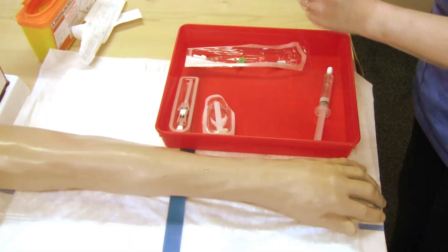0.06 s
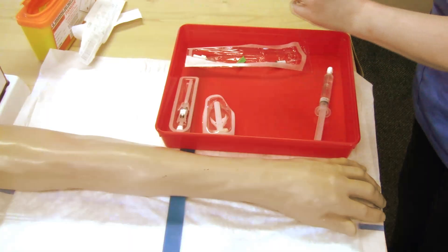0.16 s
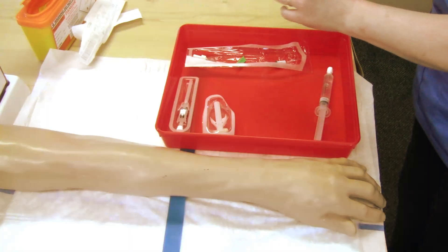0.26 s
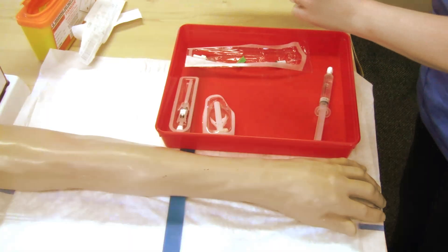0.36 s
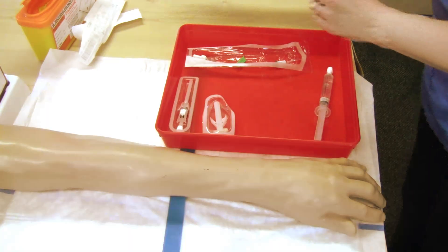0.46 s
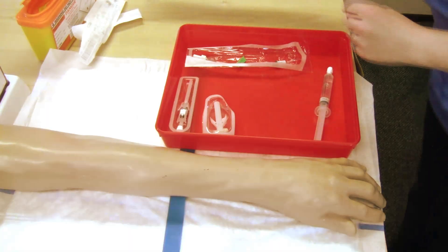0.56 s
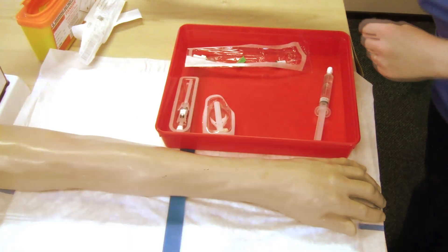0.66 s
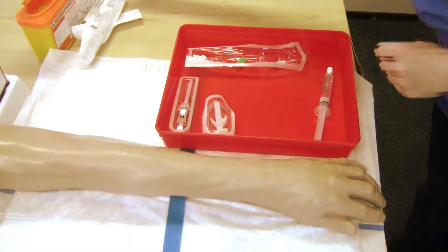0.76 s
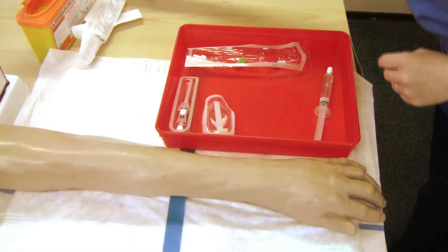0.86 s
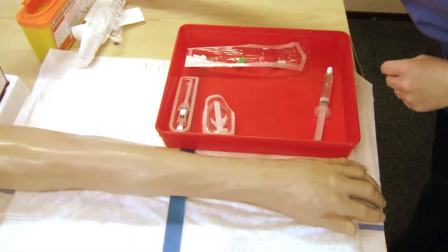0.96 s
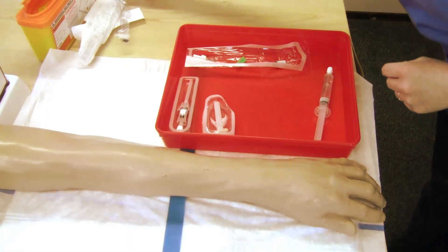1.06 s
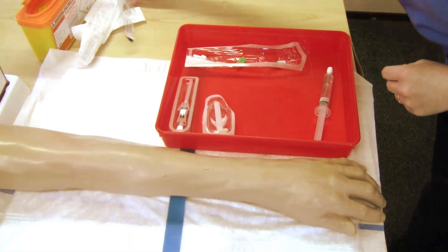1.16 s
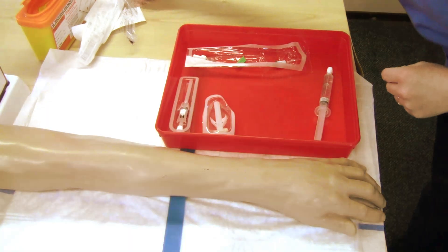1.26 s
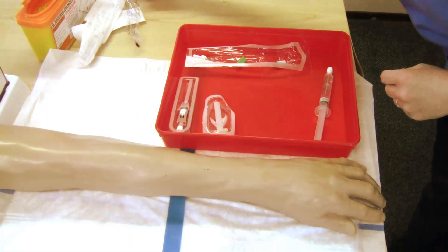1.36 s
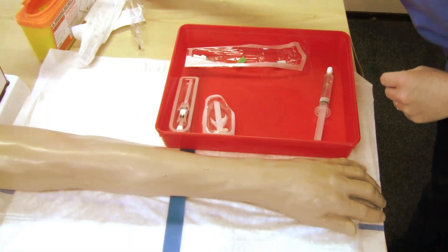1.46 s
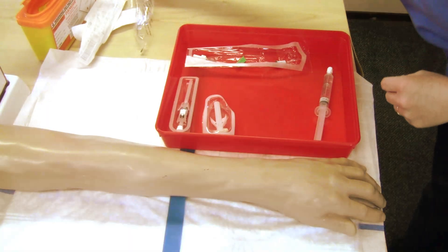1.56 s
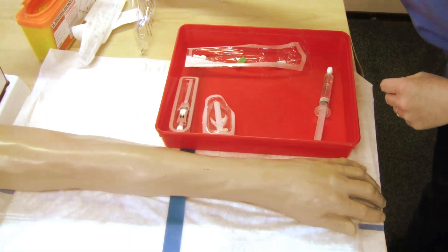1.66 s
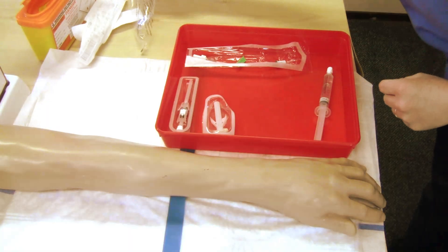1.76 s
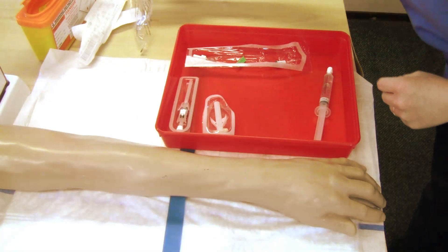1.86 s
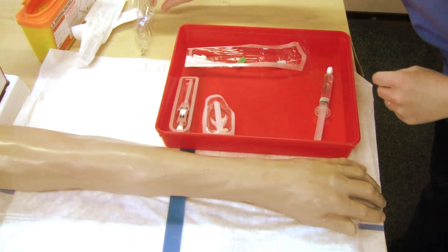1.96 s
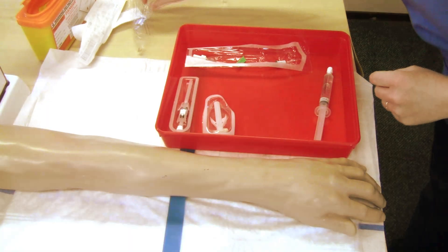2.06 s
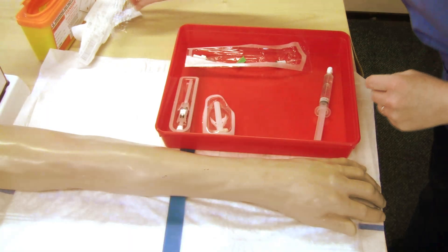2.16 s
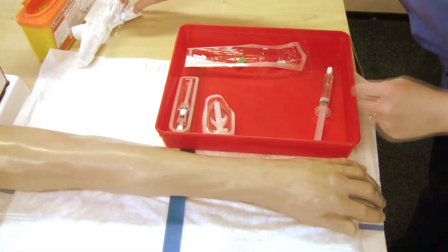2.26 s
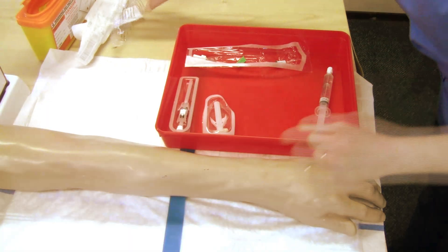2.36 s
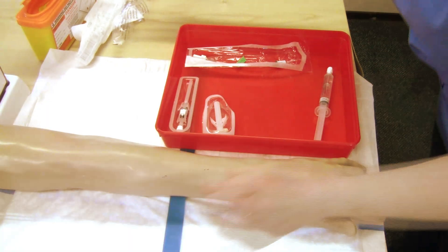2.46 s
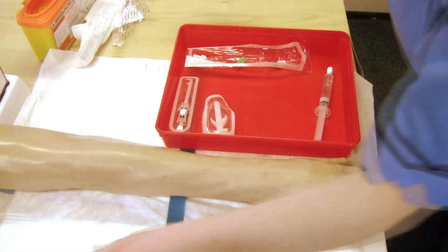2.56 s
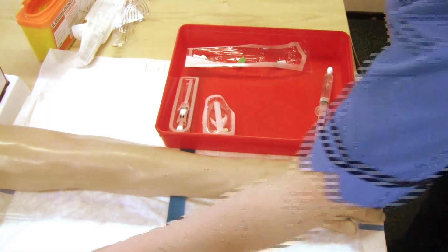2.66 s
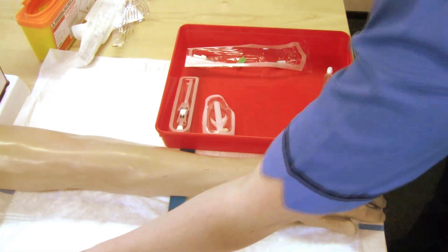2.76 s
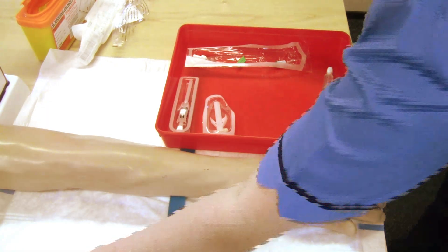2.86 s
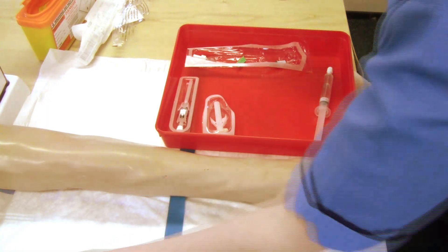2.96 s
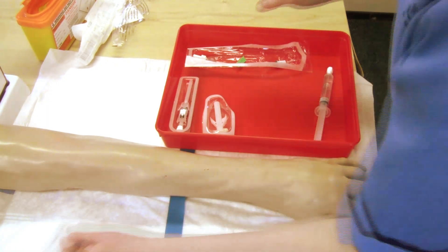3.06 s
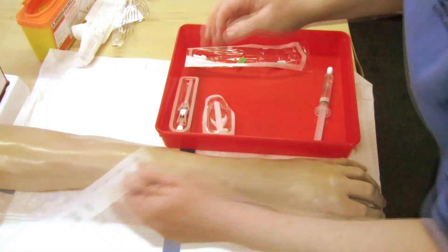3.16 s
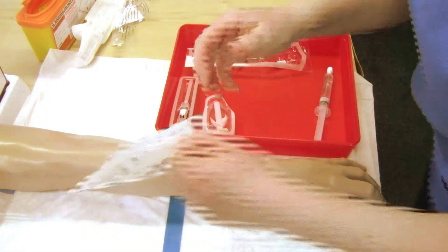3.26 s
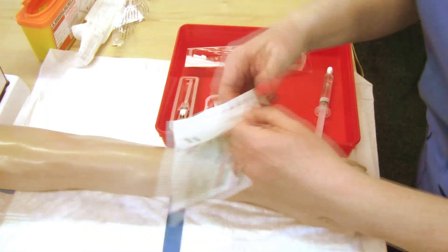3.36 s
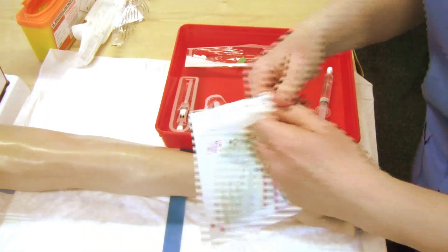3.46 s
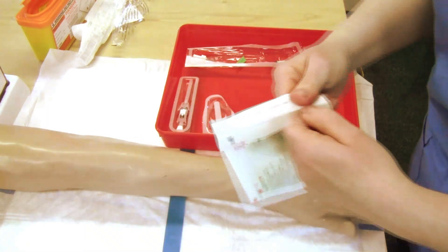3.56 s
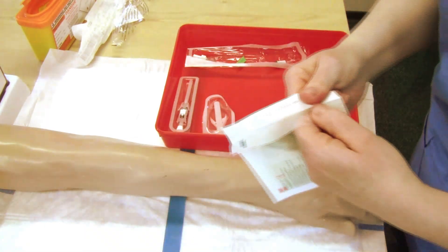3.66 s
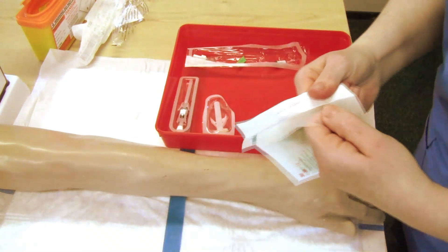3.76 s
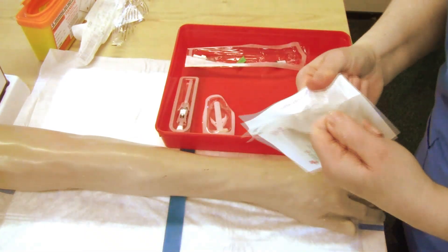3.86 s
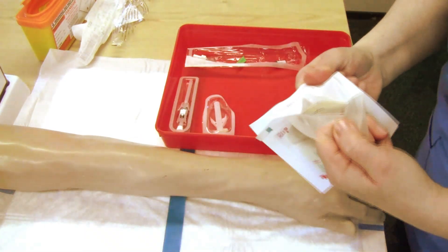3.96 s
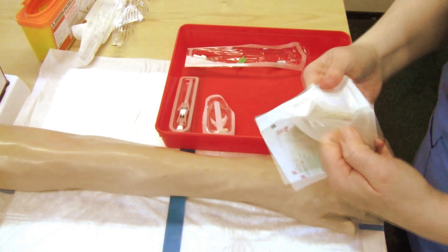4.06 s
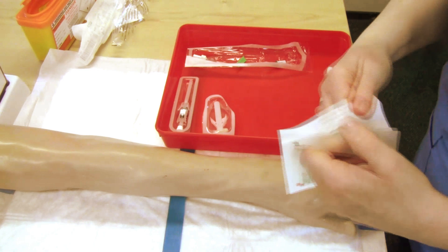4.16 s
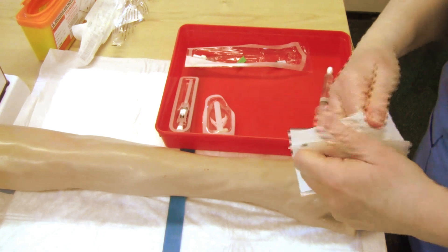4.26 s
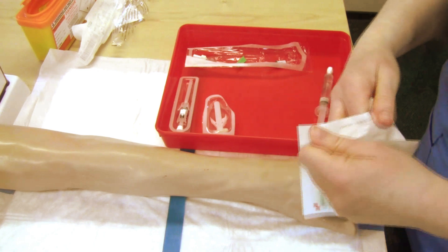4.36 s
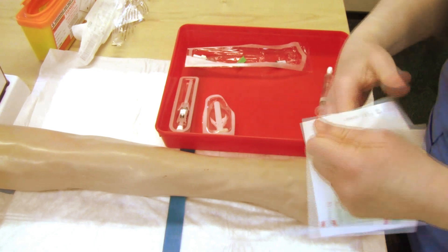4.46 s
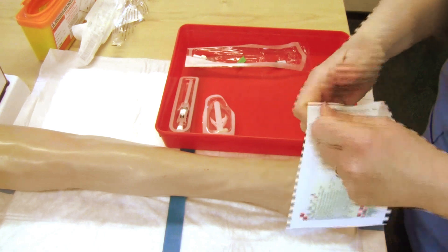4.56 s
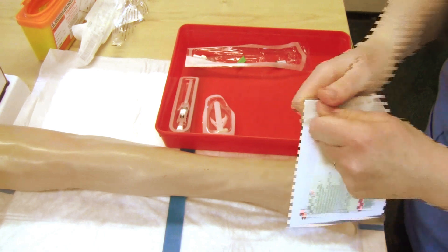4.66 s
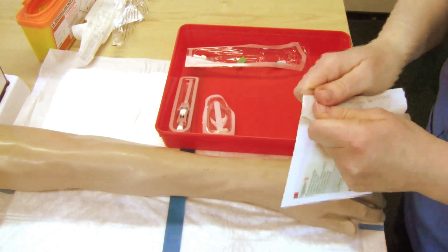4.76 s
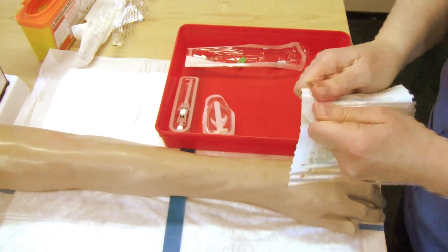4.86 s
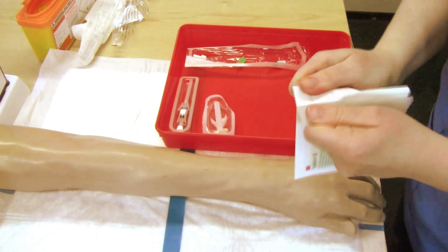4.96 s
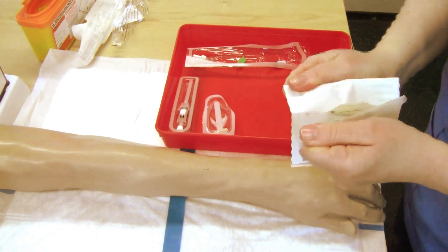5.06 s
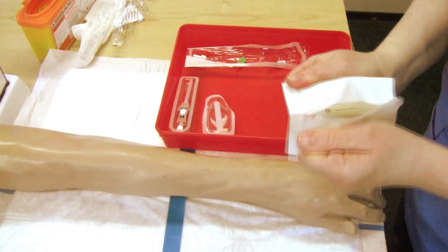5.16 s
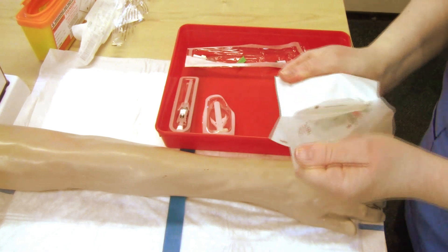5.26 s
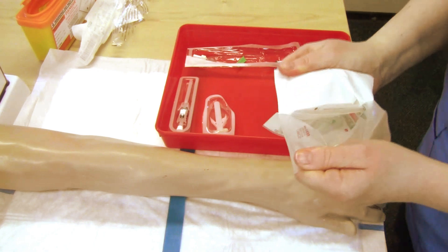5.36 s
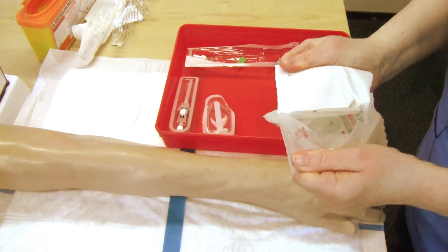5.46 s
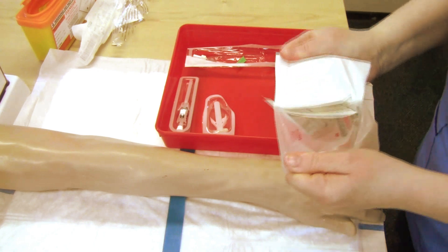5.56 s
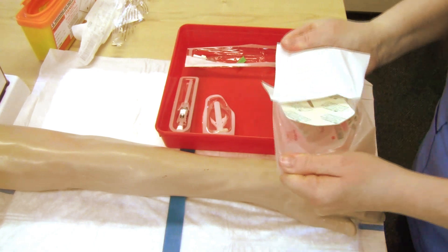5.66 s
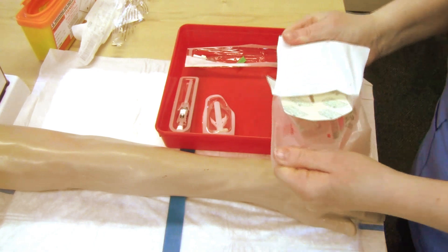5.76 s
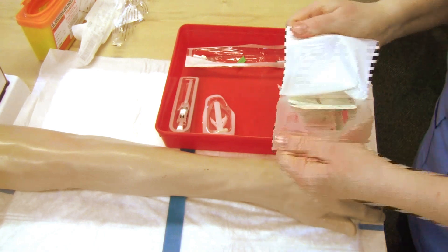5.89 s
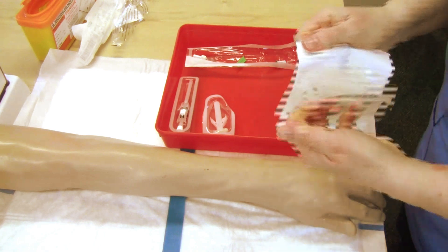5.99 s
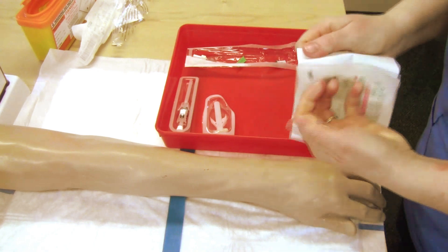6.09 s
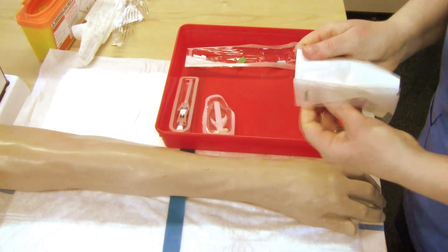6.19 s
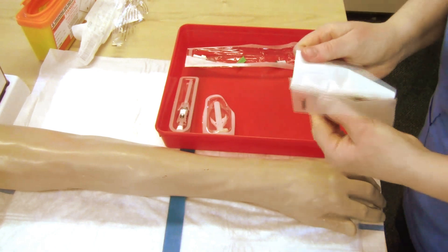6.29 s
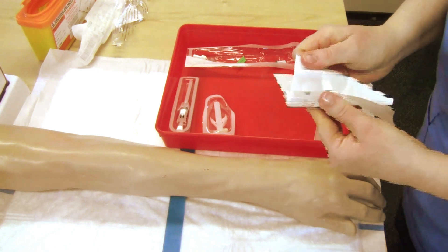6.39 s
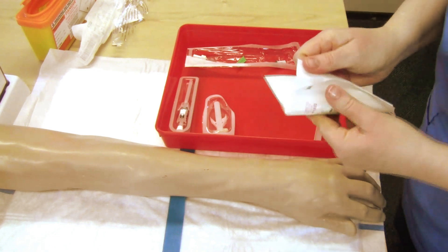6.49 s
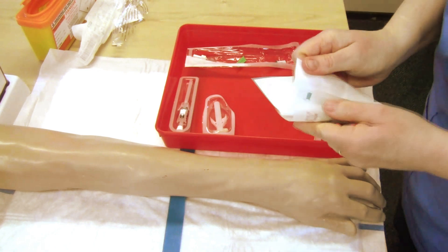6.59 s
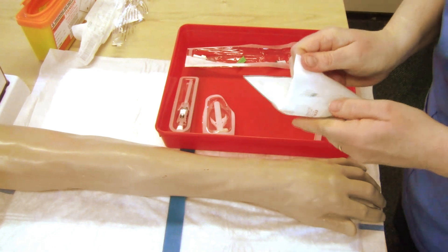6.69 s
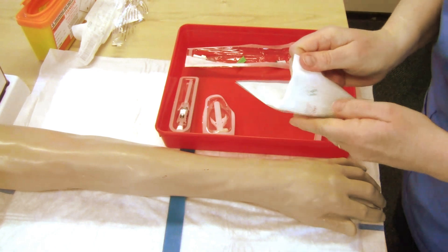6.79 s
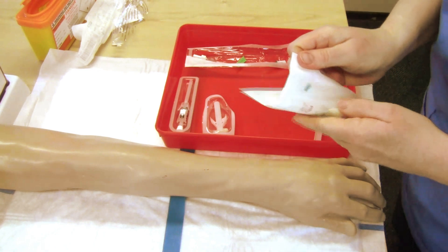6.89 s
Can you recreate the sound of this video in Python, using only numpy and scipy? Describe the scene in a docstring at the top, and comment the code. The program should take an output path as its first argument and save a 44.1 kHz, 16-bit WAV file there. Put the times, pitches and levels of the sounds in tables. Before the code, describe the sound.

A small indoor room with soft ventilation noise, a faint low hum and slight rumble. From 0 to 0.8 s a thin film wrapper is crumpled at a little distance, bright and crackly, with short room echoes. From 0.9 to 2.5 s it thins to isolated small ticks and faint rustles as it is put down. Around 3.0-3.2 s a sleeve brushes past, a soft dull cloth rub. From 3.7 s a paper-and-film pouch crackles close to the microphone; at 3.9 s its seal slips in a very loud, sharp, rapid zipping rip, overloading slightly. Crisp snaps follow to 4.6 s, then a brief lull. At 5.1 s comes another loud ripping burst with a tiny low puff, then dense stiff pops and peeling crackle until 6.0 s, strong near 5.7 s. A sharp snap at 6.2 s precedes lighter, sparser crinkles to about 6.9 s.

```python
"""Sterile packets opened over a tray

In a small treatment room, close to a stereo microphone, a film wrapper is crumpled and put down at the far
side of the table and a sleeve brushes past; then a paper-and-film pouch is peeled open nearby. Creases, crackle
and the seal are short noise bursts and ringing modes, with room echoes; cloth, air and rumble are shaped noise."""
import sys
import numpy as np
from scipy import signal
from scipy.fft import rfft, irfft
from scipy.io import wavfile

SR = 44100
rng = np.random.default_rng(int(sys.argv[2]) if len(sys.argv) > 2 else 0)


def unload_audio(sound):
    """Save the sound as a 16-bit wav file, at the path given as the first command line argument."""
    columns = np.transpose(np.atleast_2d(sound))
    # keep every value between -1 and 1, then stretch to whole-number steps
    steps = np.round(np.clip(columns, -1, 1) * 32767)
    wavfile.write(sys.argv[1], SR, steps.astype(np.int16))


N = 305613
TIME = np.arange(N) / SR
# the sheet's low body lies below the first edge, the treble of its creases above the second
BODY_HZ, TREBLE_HZ = 1400, 5500


def undb(db):
    """Decibels to gain."""
    return 10 ** (np.asarray(db) / 20)


def unit(x):
    """Scale to rms 1."""
    return x / np.sqrt(np.mean(x ** 2) + 1e-18)


def along(points, hz):
    """Read (Hz, value) points on a log-frequency axis."""
    f, value = np.transpose(points)
    return np.interp(np.log(hz + 1), np.log(f), value)


def over_time(points):
    """Read (s, dB) points at every sample."""
    return np.interp(TIME, *np.transpose(points))


def colour(x, points):
    """Filter by a (Hz, dB) spectrum."""
    hz = np.fft.rfftfreq(len(x), 1 / SR)
    return irfft(rfft(x) * undb(along(points, hz)), len(x))


def causal(gain):
    """The quickest (minimum-phase) impulse response that has this gain over frequency."""
    cepstrum = irfft(np.log(gain + 1e-6))
    half = len(cepstrum) // 2
    # fold the cepstrum onto positive times
    cepstrum[1:half] *= 2
    cepstrum[half + 1:] = 0
    return irfft(np.exp(rfft(cepstrum)))[:half]


def add(track, s, sound):
    """Mix a sound in at time s."""
    start = int(np.clip(s * SR, 0, N - 1))
    track[start:start + len(sound)] += sound[:N - start]


def ventilation(air_db=-51, side_db=-11, waver_rad=.25):
    """Steady air noise, partly different in the two channels, with a slightly wavering hum in both."""
    # The air noise. Each row: frequency in Hz, relative level in dB.
    air = [(25, -16), (45, -18.5), (80, -0.5), (130, -5), (210, -5), (310, -7), (450, -13), (700, -11.5),
           (1500, -15), (3500, -21.5), (7000, -25.5), (11000, -32), (16000, -39)]
    # The hum's tones. Each row: frequency in Hz, rms level in dB.
    hum = [(59.5, -100), (99.7, -66.5), (199.4, -56.5), (300.5, -61)]
    mid, side = (unit(colour(rng.standard_normal(N), air)) * undb(air_db) for _ in range(2))
    for hz, db in hum:
        drift = np.interp(TIME, np.linspace(0, N / SR, 40), rng.standard_normal(size=40))
        phase = 2 * np.pi * hz * TIME + waver_rad * drift
        mid = mid + np.sqrt(2) * undb(db) * np.sin(phase)
    side = undb(side_db) * side
    return np.array([mid + side, mid - side])


def rumble(corner_hz=110):
    """A faint dull rumble, noise kept to the lowest octaves, comes and goes."""
    # The rumble's swell. Each row: time in seconds, level in dB.
    swell = [(0, -72), (1, -64), (1.5, -54.5), (3.3, -58), (4, -65)]
    lowpass = signal.butter(4, corner_hz, fs=SR, output="sos")
    low = signal.sosfilt(lowpass, rng.standard_normal(N))
    return unit(low) * undb(over_time(swell))


def sheet_responses(size=1024, order=8):
    """How the sheet answers a tick: the flexing panel, the facets, the sharp creases."""
    # What the sheet radiates. Each row: frequency in Hz, gain in dB.
    radiation = [(120, -32), (260, -10), (450, -8), (680, -5.5), (1000, -5), (1250, -6), (1600, 0.5),
                 (2400, 8), (3300, 13.5), (4600, 9), (6000, 3.5), (8300, 5), (10500, 0.5), (13000, -10.5),
                 (16000, -29)]
    hz = np.fft.rfftfreq(size, 1 / SR)
    below_body, below_treble = (1 / (1 + (hz / edge) ** order) for edge in (BODY_HZ, TREBLE_HZ))
    shares = below_body, below_treble - below_body, 1 - below_treble
    gain = undb(along(radiation, hz))
    return [causal(gain * np.sqrt(np.abs(share))) for share in shares]


def body_level(s, treble_db, body_per_treble=0.31):
    """Low body of a buckle, in dB: more on a slack sheet than a taut one, less on a small bright patch."""
    # How slack the sheet hangs. Each row: time in seconds, body below 1.4 kHz in dB before the patch's share.
    slackness = [(0, -4.5), (0.5, -10), (1, -6.5), (1.3, -10), (3.68, -0.5), (3.75, -42), (3.97, -10.5),
                 (4.22, -12.5), (4.42, -3.5), (4.96, -4), (5.11, -24.5), (5.16, -6.5), (5.61, -4.5),
                 (5.69, -7.5), (5.81, -4.5), (6.52, -5), (6.93, -17)]
    return np.interp(s, *np.transpose(slackness)) - body_per_treble * treble_db


def radiate(forces, responses, seconds, db, body_db, treble_db):
    """Three forces sound through body, facets and creases; the levels are rms over the given seconds."""
    out = 0
    for force, response, part_db in zip(forces, responses, (body_db, 0, treble_db)):
        part = signal.fftconvolve(force, response)
        to_unit = np.sqrt(seconds * SR / np.sum(part ** 2))
        out = out + part * undb(db + part_db) * to_unit
    return out


def facet(dice, t, low_hz=900, high_hz=9000):
    """A few short decaying modes of one patch of film; every patch has its own size."""
    place, life, phase = dice.reshape(3, -1, 1)
    hz = low_hz * (high_hz / low_hz) ** place
    ring_s = .001 * (.5 + life)
    modes = np.sin(2 * np.pi * (hz * t + phase)) * np.exp(-t / ring_s)
    return unit(np.sum(modes, axis=0))


def strokes(responses, per_s=1300, thinning=.45, spread_db=3.0, edge=0.098, settle_s=0.0017,
            rub=0.36, fuller_db=3, count=12):
    """Tiny creases and glue threads crackle at random over the rub of paper; gentler strokes more sparsely."""
    # Strokes of crumpling, sliding and peeling. Each row: start in seconds, end in seconds,
    # level from 1.4 to 5.5 kHz in dB, treble above that in dB relative to it.
    hand_strokes = [(0, 0.066, -29, 5.5), (.111, 0.194, -33.5, 5.5), (0.272, 0.389, -33.5, 2),
                    (0.434, 0.552, -43, 0.5), (.9, 1.18, -48.5, -2.5), (1.366, 1.451, -49, 0.5),
                    (1.983, 2.006, -48, -1), (2.185, 2.226, -39.5, 2.5), (2.245, 2.397, -47, -2),
                    (2.596, 2.916, -73, 0), (3.149, 3.32, -61.5, 2.5), (3.439, 3.725, -57, 5.5),
                    (3.905, 3.919, -12.5, -2.5), (3.918, 4.027, -19.5, 2.5), (4.466, 4.67, -45, 0.5),
                    (4.825, 4.857, -37, -7), (4.95, 5.085, -38, -10.5), (5.104, 5.132, -6.5, -6),
                    (5.126, 5.187, -19, -1.5), (5.246, 5.352, -29.5, -5.5), (5.314, 5.402, -21, 0.5),
                    (5.659, 5.737, -24.5, -7), (5.668, 5.694, -16.5, 1), (5.821, 6.053, -50.5, -12),
                    (6.078, 6.114, -28.5, -1.5), (6.116, 6.353, -42, -2.5), (6.376, 6.607, -46, 4.5),
                    (6.678, 6.798, -38.5, -4), (6.85, 6.933, -44.5, -1)]
    out, t, age = np.zeros(N), np.arange(SR // 120) / SR, np.arange(SR // 3) / SR
    for start, end, db, treble_db in hand_strokes:
        rate = per_s * undb(thinning * (db + 20.0))  # ticks per second
        ticks = np.zeros((3, len(age)))
        for _ in range(count):
            chance = rng.random(len(age))
            sizes = undb(spread_db * np.minimum(rng.exponential(size=len(age)), 4))
            burst = unit(rng.standard_normal(len(t)) * np.exp(-t / settle_s))
            grain = burst + facet(rng.random(size=9), t)
            # some patches of the sheet sound dull, others bright
            tone = undb(4.1 * rng.standard_normal((3, 1)))
            hits = (chance < rate / count / SR) * sizes
            ticks += tone * signal.fftconvolve(hits, grain)[:len(age)]
        seconds = max(end - start, .01)
        # gentler strokes take hold and let go more slowly
        from_edge = np.minimum(age, seconds - age) / (edge * seconds)
        grip = np.clip(from_edge * undb(thinning * (db + 45)), 0, 1)
        forces = [grip * (unit(row) + rub * rng.standard_normal(len(age))) for row in ticks]
        body_db = body_level((start + end) / 2, treble_db) + fuller_db
        add(out, start, radiate(forces, responses, seconds, db, body_db, treble_db))
    return out


def flexing(per_s=300, edge_s=0.012):
    """Larger panels pop softly in and out at random: low, papery flutter."""
    # The whole pouch or wrapper flexing under the fingers. Each row: start in seconds, end in seconds, level in dB.
    flexes = [(0, 0.2, -45.5), (5.327, 5.407, -34.5), (5.615, 5.662, -28), (5.823, 6.037, -56)]
    # The hollow sound of a flexing panel. Each row: frequency in Hz, gain in dB.
    panel = [(120, -27), (240, -8), (340, -1), (480, 1), (650, -10), (1100, -24), (3000, -60)]
    sizes = undb(4.5 * rng.standard_normal(N))
    pops = (rng.random(N) < per_s / SR) * rng.choice([-1, 1], N) * sizes
    flutter, out = colour(pops, panel), np.zeros(N)
    for start, end, db in flexes:
        part = flutter * np.clip(np.minimum(TIME - start, end - TIME) / edge_s, 0, 1)
        # the level is rms over the flex alone
        out += unit(part) * undb(db) * np.sqrt(abs(end - start) * SR / N)
    return out


def snaps(responses, travel_s=0.0032, body_s=0.0021, facet_s=0.002, crease_s=0.00046, ring=0.56,
          crack=1.9, treble_crack=3, creak_db=-22, span_s=0.0058):
    """A crease creaks, then a buckle runs along it for a few ms; high frequencies die first."""
    # Creases that buckle with a distinct snap. Each row: time in seconds, level from 1.4 to 5.5 kHz in dB,
    # treble above that in dB relative to it.
    buckles = [(.147, -18, -1.5), (0.209, -34.5, 10.5), (0.265, -32, 7.5), (.403, -34.5, 6),
               (.539, -33.5, 1), (.63, -38.5, 0.5), (.681, -33.5, -1.5), (.759, -36, 2), (.782, -33, -2.5),
               (0.9, -31.5, 1), (0.9636, -36.5, 6), (1.0059, -33.5, 9), (1.059, -39.5, 7),
               (1.3209, -43.5, -5), (1.334, -43.5, -56), (1.394, -47, 11), (1.642, -39.5, -2.5),
               (1.733, -46, -1.5), (1.918, -57, 7), (2.261, -37.5, 5.5), (2.281, -38, -9),
               (2.308, -45.5, 11.5), (2.538, -35, -2.5), (2.948, -42.5, -11), (3.1131, -38.5, -3),
               (3.4497, -33.5, 1.5), (3.534, -41.5, -2.5), (3.6786, -29, -11), (3.7517, -20, -8.5),
               (3.8171, -31.5, -9), (3.893, -19.5, -1), (3.996, -18, 4), (4.136, -34, 4), (4.164, -24, 0),
               (4.176, -13.5, -8.5), (4.187, -17.5, -6), (4.2146, -13, -1), (4.2344, -21.5, 8.5),
               (4.26, -22, 2), (4.4171, -18.5, 0.5), (4.5063, -21, -3), (4.561, -23, -5),
               (4.8885, -29, -2.5), (4.9639, -28, -7.5), (5.022, -39.5, 3), (5.0811, -15, -9),
               (5.094, -15.5, -9), (5.18, -29, 8.5), (5.239, -22, -7), (5.265, -31, 9), (5.392, -20.5, 0.5),
               (5.411, -12.5, 0.5), (5.463, -27, -22), (5.495, -26, -9), (5.6017, -20, -10),
               (5.6118, -19, -3), (5.642, -15, -3.5), (5.658, -18.5, -2), (5.6953, -8.5, 0.5),
               (5.7781, -14, 1), (5.8107, -15.5, -0.5), (5.8778, -16.5, -4), (5.933, -25, -14),
               (5.974, -21.5, -15), (5.989, -24, 3.5), (5.9994, -16, -6), (6.082, -29, -10),
               (6.157, -24, -6.5), (6.2132, -12.5, -5), (6.2426, -23, -1), (6.3773, -29.5, -1),
               (6.409, -20, -6), (6.45, -27, -1.5), (6.5145, -19.5, -3), (6.718, -27.5, -15),
               (6.757, -32, -21), (6.856, -34, -12)]
    lead = SR // 200  # samples of creak ahead of the snap
    out, t = np.zeros(N), np.arange(SR // 60) / SR
    for s, db, treble_db in buckles:
        since = np.maximum(t - travel_s * rng.random(), 0)
        rattle, modes = rng.standard_normal(len(t)), facet(rng.random(size=30), t)
        creak = undb(creak_db) * rng.standard_normal(lead) ** 3 * rng.random()
        forces = []
        for settle_s, first in (body_s, crack), (facet_s, crack), (crease_s, treble_crack):
            force = unit(rattle * np.exp(-since / settle_s)) + ring * modes
            force[0] += first * np.sign(rattle[0])
            forces.append(np.r_[creak, force])
        body_db = body_level(s, treble_db)
        add(out, s - lead / SR, radiate(forces, responses, span_s, db, body_db, treble_db))
    return out


def room_response(gap_s=0.0011, early_s=0.0079, early=1.75, lumpy=0.88, tilt_db=-1.67, size=2048):
    """Table and tray throw back a quick cluster of echoes; the walls add a longer, duller tail."""
    # Reverberation. Each row: frequency in Hz, time to fall by 60 dB in seconds.
    reverberation = [(200, 0.98), (1000, 0.55), (4000, 0.36), (9000, 0.35), (15000, 0.074)]
    t = np.arange(SR // 2) / SR
    hz = np.fft.rfftfreq(len(t), 1 / SR)
    # diffuse reflections: every short stretch carries all frequencies alike
    phases = rng.random((len(t) // size + 1, size // 2 + 1))
    scatter = irfft(np.exp(2j * np.pi * phases)).ravel()[:len(t)]
    echoes = rfft(scatter * np.exp(lumpy * rng.standard_normal(len(t))))
    centres = np.geomspace(125, 16000, 8)
    tail = 0
    for centre, pick in zip(centres, np.eye(len(centres))):
        band = irfft(echoes * along(np.c_[centres, pick], hz), len(t))
        decay = np.exp(-np.log(1000) * t / along(reverberation, centre))
        tail = tail + band * undb(tilt_db * np.log2(centre)) * decay
    tail = tail * (1 + early * np.exp(-t / early_s)) * np.clip(t / gap_s - .5, 0, 1)
    # unit gain in the facets' band
    middle = rfft(tail)[(hz > BODY_HZ) & (hz < TREBLE_HZ)]
    return tail / np.sqrt(np.mean(np.abs(middle) ** 2))


def room(send, per_s=12, count=8):
    """The hands keep moving and turning the sheet: the echoes fade round a ring of patterns, 12 steps a second."""
    place = TIME * per_s
    out = 0
    for k in range(count):
        share = np.clip(1 - np.abs((place - k) % count - count / 2), 0, 1)
        out = out + signal.oaconvolve(send * np.sqrt(share), room_response())[:N]
    return out


def sleeve():
    """Cloth rubs and flaps unevenly as the arm reaches across the table: noise with a fluttering level."""
    # The sleeve brushing past. Each row: time in seconds, level in dB before the flutter.
    passing = [(2.85, -66), (3.0, -51), (3.05, -39), (3.13, -41), (3.17, -48), (3.33, -52), (3.45, -70)]
    # Cloth rubbing. Each row: frequency in Hz, relative level in dB.
    cloth = [(25, -21), (60, -6), (125, -3.5), (300, -9.5), (700, -12), (1500, -20), (3500, -29),
             (8000, -48), (14000, -77)]
    knots = rng.standard_normal(size=256)
    flutter_db = 1.2 * np.interp(TIME * 35, np.arange(len(knots)), knots)  # 35 knots a second
    rubbing = unit(colour(rng.standard_normal(N), cloth))
    return rubbing * undb(over_time(passing) + flutter_db)


def puffs(hz=70, swell_s=0.012):
    """The opening pouch shoves a little air: a low, quickly damped swing."""
    # Puffs as the pouch springs open. Each row: start in seconds, peak of the envelope in dB.
    shoves = [(3.917, -48), (5.11, -38)]
    out, t = np.zeros(N), np.arange(SR // 10) / SR
    envelope = t / swell_s * np.exp(1 - t / swell_s)
    for s, db in shoves:
        add(out, s, undb(db) * np.sin(2 * np.pi * hz * t) * envelope)
    return out


def seal(start_s=3.9307, jerk_s=.0047, slowing=.07, count=7, ring_hz=8600, width_hz=2200, slip_s=0.00021,
         peak_db=-0.5, panel_hz=1530, panel_s=.018, panel_db=-23):
    """The glued seam slips in jerks, ever wider apart, each ringing the taut film and the paper panel."""
    out, t, late = np.zeros(N), np.arange(SR // 200) / SR, np.arange(SR // 10) / SR
    edges_hz = np.clip([ring_hz - width_hz / 2, ring_hz + width_hz / 2], 100, SR / 2 - 100)
    taut = signal.butter(2, edges_hz, "band", fs=SR, output="sos")
    s = start_s
    for k in range(count):
        jerk = signal.sosfilt(taut, rng.standard_normal(len(t)) * np.exp(-t / slip_s))
        add(out, s, jerk * undb(peak_db) / np.max(np.abs(jerk)))
        paper = np.sin(2 * np.pi * (panel_hz * late + rng.random())) * np.exp(-late / panel_s)
        add(out, s, undb(panel_db) * paper)
        s += jerk_s * (1 + slowing * k)
    return out


def scene(off_axis=0.17, sleeve_side_db=-14, hiss_db=-72):
    """The packets sound almost straight ahead, a shade to the left; their echoes differ between the ports."""
    # Distance of the packets, heard as the room's share. Each row: time in seconds, send to the room in dB.
    distance = [(0, -2), (1, -2), (2.3, -3), (3.4, 0), (3.7, -7.5), (4.3, -6.5), (5.2, -7), (6.9, -6)]
    # How unlike the two microphone ports hear the packets. Each row: frequency in Hz, side level in dB.
    ports = [(200, -19), (500, -17), (1200, -24.5), (3000, -26), (5500, -13.5), (8000, -17.5),
             (10500, -10.5), (13000, 7.5)]
    responses = sheet_responses()
    direct = snaps(responses) + seal() + flexing() + strokes(responses)
    send = direct * undb(over_time(distance))
    mid = direct + room(send) + sleeve() + puffs()
    side_echoes = colour(signal.oaconvolve(direct, room_response())[:N], ports)
    # a tiny lag between the ports leaves the slope of the wave in the side signal
    side = side_echoes - off_axis * np.gradient(direct)
    side = side + undb(sleeve_side_db) * sleeve()
    balance = undb([[.15], [-.15]])  # left, right
    microphone_hiss = undb(hiss_db) * rng.standard_normal((2, N))
    packets = np.array([mid + side, mid - side]) * balance
    return packets + ventilation() + rumble() + microphone_hiss


def record(dry, ceiling=1.0, top_db=-1, right_top_db=-5, top_hz=16000):
    """Peaks over the ceiling overload the input; the top is dull, more so on the right, and cut above 16 kHz."""
    left, right = np.clip(dry, -ceiling, ceiling)
    dulled = [colour(left, [(9000, 0.0044), (13000, top_db)]),
              colour(right, [(9000, 0.027), (13000, right_top_db)])]
    lowpass = signal.ellip(8, .2, 70, top_hz, fs=SR, output="sos")
    return signal.sosfilt(lowpass, dulled)


dry = scene()
out = record(dry)
unload_audio(out)
```